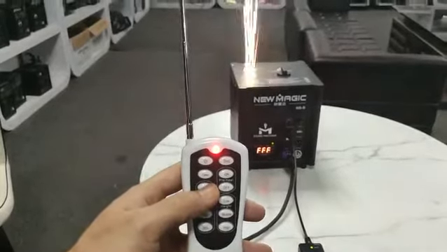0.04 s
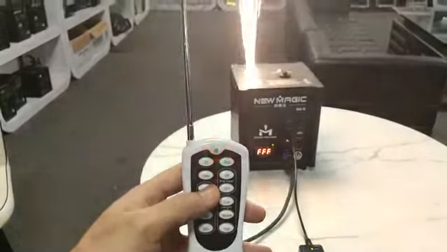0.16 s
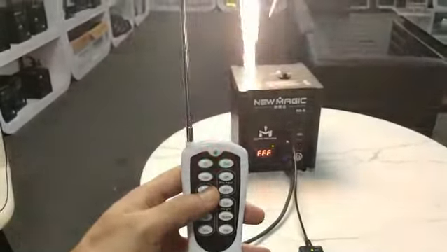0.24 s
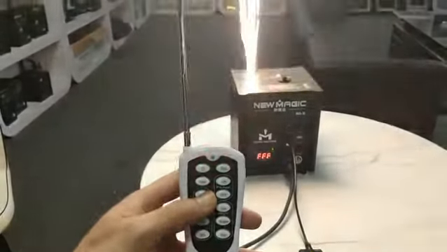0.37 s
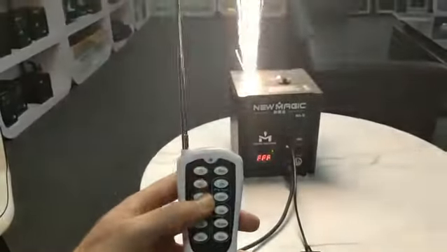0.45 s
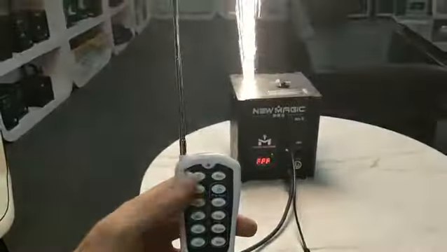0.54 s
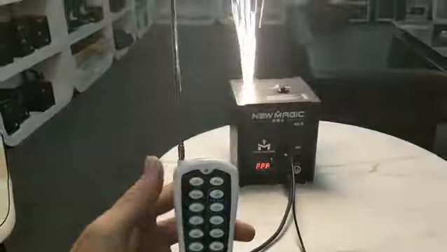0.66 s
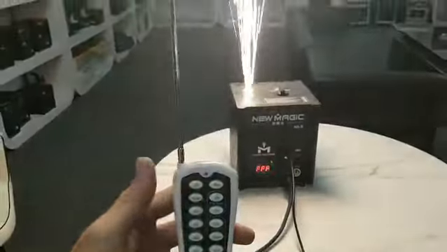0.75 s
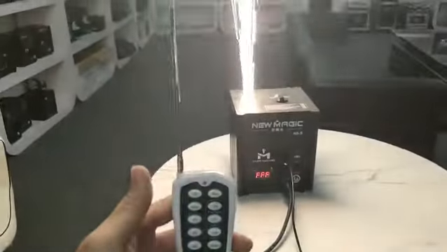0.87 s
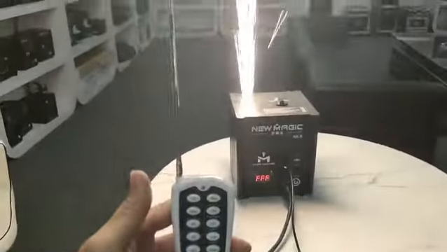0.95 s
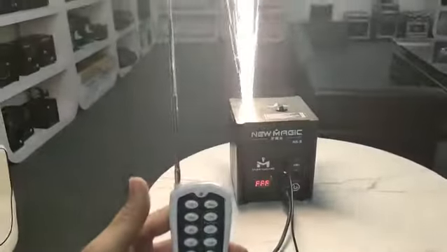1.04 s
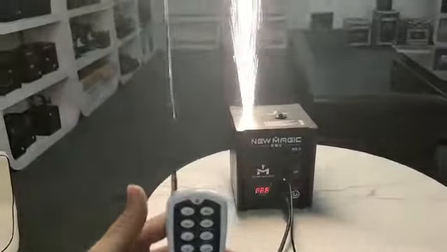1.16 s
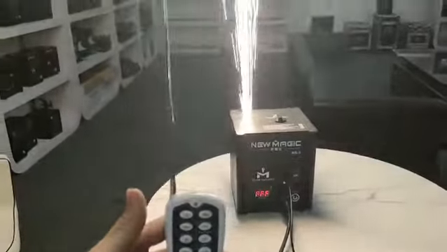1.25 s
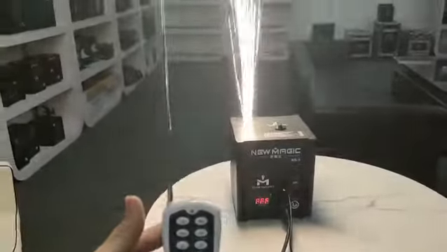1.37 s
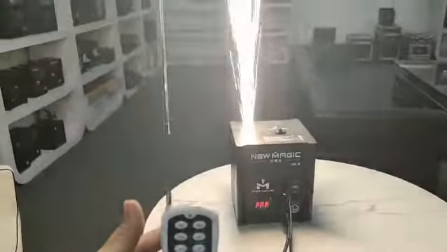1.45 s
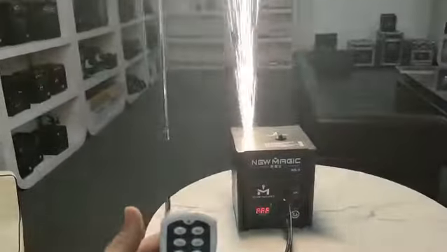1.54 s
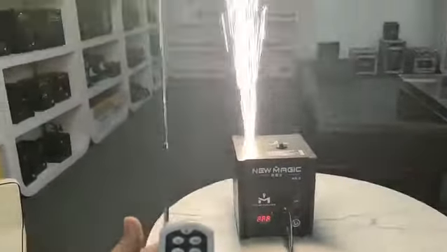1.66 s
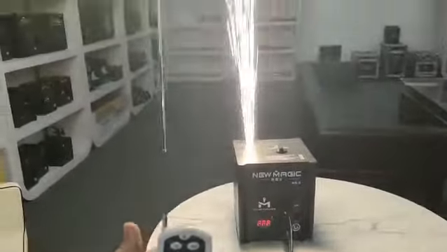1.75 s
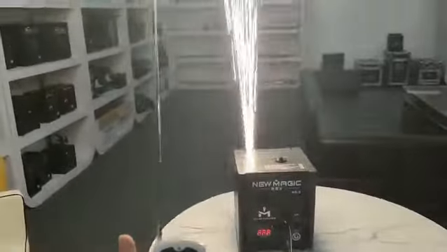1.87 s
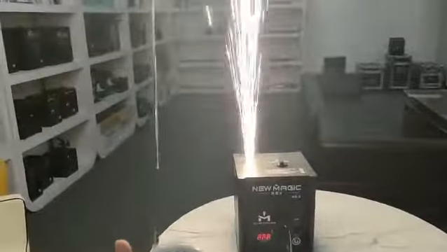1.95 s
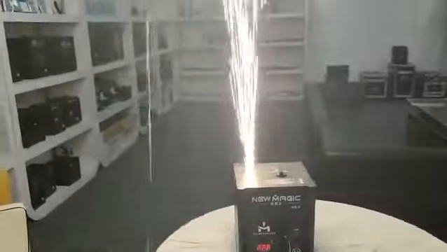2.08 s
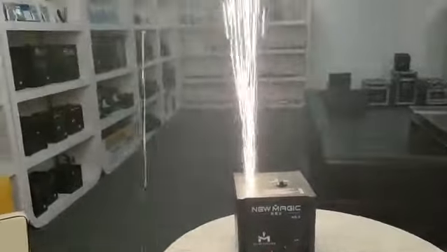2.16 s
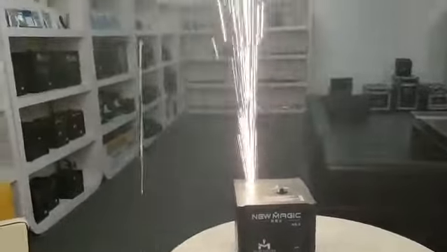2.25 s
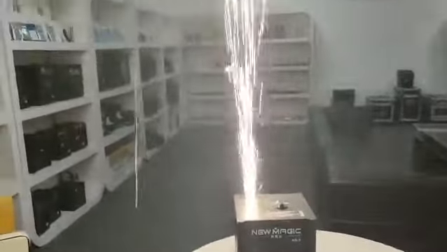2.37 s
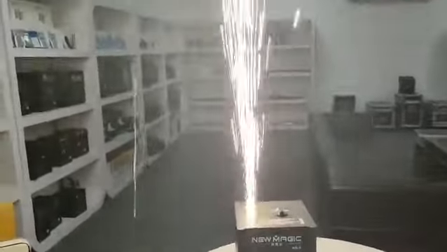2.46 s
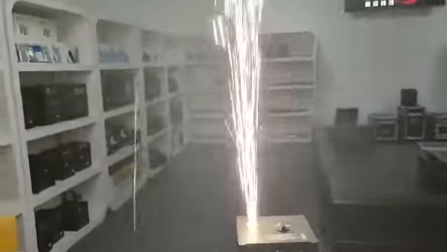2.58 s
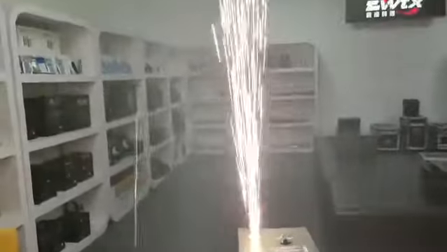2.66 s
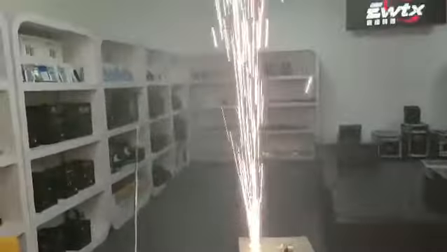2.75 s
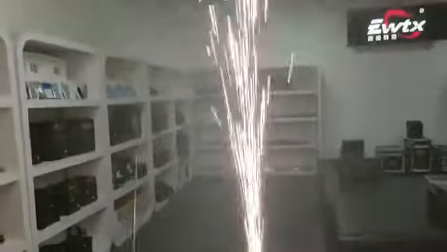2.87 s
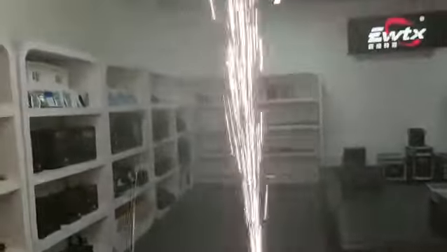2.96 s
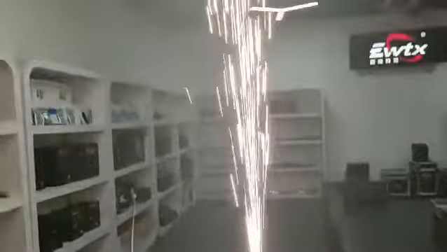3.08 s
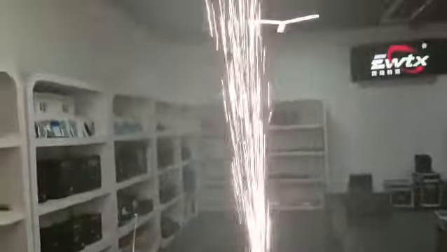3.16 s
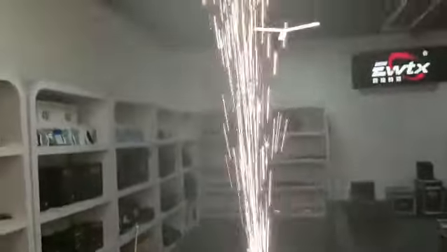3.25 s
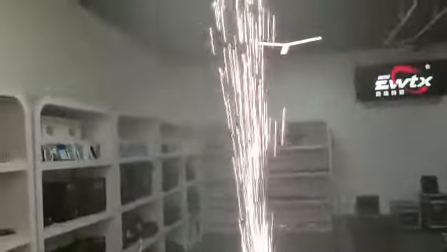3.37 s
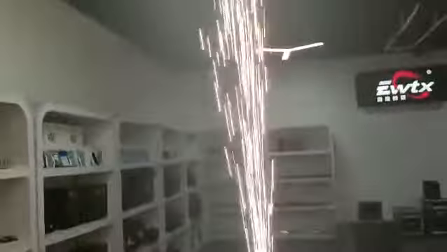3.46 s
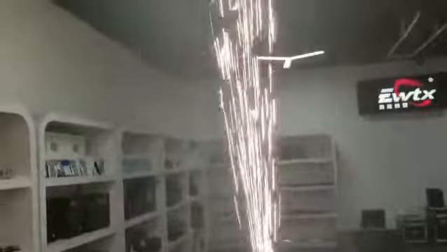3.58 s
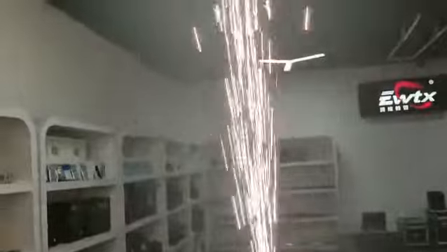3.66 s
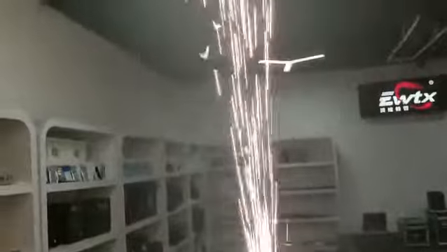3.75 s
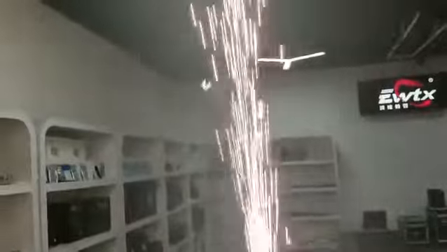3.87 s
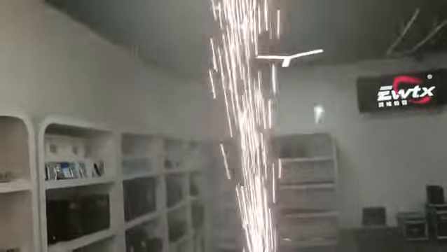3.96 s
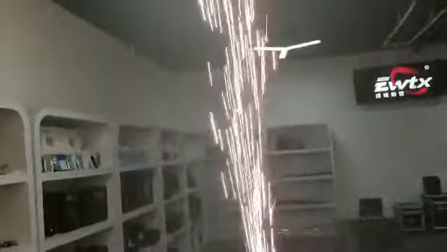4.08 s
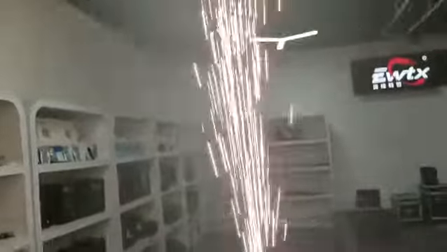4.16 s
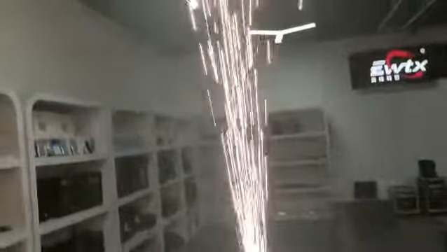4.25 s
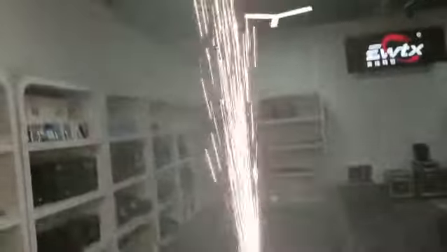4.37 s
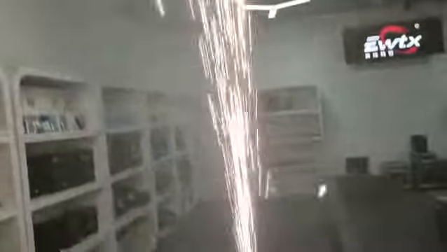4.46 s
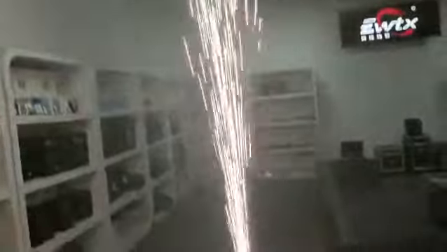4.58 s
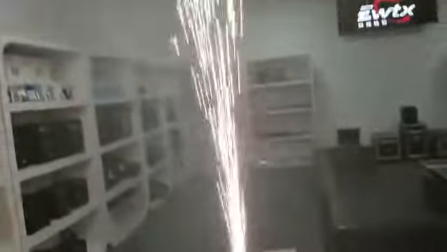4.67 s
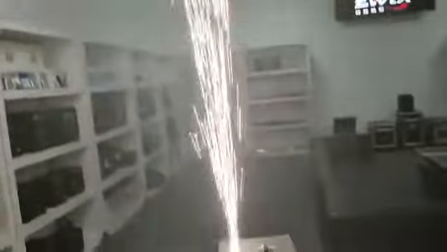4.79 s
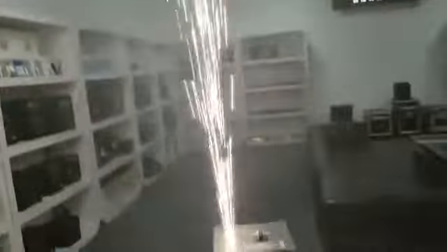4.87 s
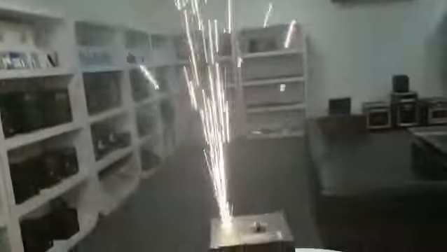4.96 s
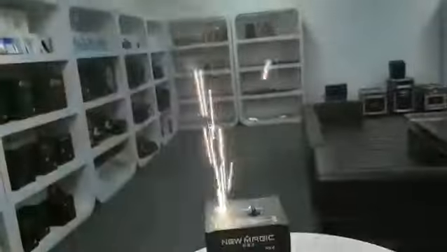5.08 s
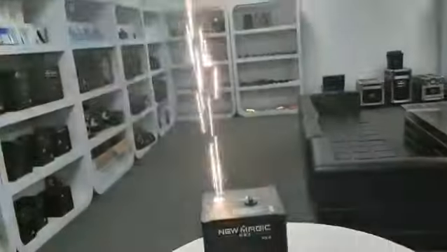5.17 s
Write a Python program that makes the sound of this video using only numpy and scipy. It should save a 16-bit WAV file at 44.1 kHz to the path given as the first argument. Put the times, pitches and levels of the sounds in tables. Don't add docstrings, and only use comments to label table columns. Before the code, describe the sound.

From the very start a spark fountain machine is running at full strength, a metre or two from a hand-held phone in a hard-walled showroom. A broad, breathy roar of air dominates, dense in the mids, with hollow duct resonances around 1.3 kHz and a flickering hiss, cut off above about 7.5 kHz. Beneath it a motor hums near 222 Hz, wavering slightly in pitch, with clean whining overtones, mostly around 0.9 to 2.2 kHz and one fainter near 4.5 kHz. They swell and fade separately, boldest in the first two seconds. From about 2 to 4 s, as the phone is raised, the whine thins and the duct ring grows and sinks slightly. At about 4.6 s the motor cuts abruptly; a high whine glides down and fades while the rush dies away quickly, low tones lingering longest, towards a soft building rumble and 34 Hz drone. Wide stereo, slightly watery phone compression.

```python
import sys
import numpy as np
from scipy import signal
from scipy.io import wavfile
from scipy.ndimage import uniform_filter1d

SR = 44100
rng = np.random.default_rng(int(sys.argv[2]) if len(sys.argv) > 2 else 0)


def linear_from_db(decibels):
    return 10 ** (np.asarray(decibels, float) / 20)


def to_wav(sig):
    pcm = np.clip(np.atleast_2d(sig), -1, 1) * 32767
    pcm = np.round(pcm).astype(np.int16)
    wavfile.write(sys.argv[1], SR, pcm.T)


N = 230334
WINDOW, HOP = 1024, 256


def curves(table, t):
    s, *columns = np.transpose(table)
    return [np.interp(t, s, column) for column in columns]


def over(table, hz):
    f, value = np.transpose(table)
    return np.interp(np.log(hz + 1), np.log(f), value)


def walk(shape, *spans):
    x = rng.standard_normal(shape)
    for axis, span in enumerate(spans):
        size = max(int(span), 1)
        x = uniform_filter1d(uniform_filter1d(x, size, axis=axis), size, axis=axis)
    return x / x.std()


def grid():
    hz = np.arange(WINDOW // 2 + 1)[:, None] * SR / WINDOW
    return hz, np.arange(-(-N // HOP) + 1) * HOP / SR


def noise(db, like, lean_db):
    mid, side = signal.stft(rng.standard_normal((2, N)), nperseg=WINDOW, noverlap=WINDOW - HOP)[2]
    like = np.clip(like, -1, 1)
    mid = mid * np.sqrt((1 + like) / 2)
    side = side * np.sqrt((1 - like) / 2)
    left = (mid + side) * linear_from_db(db + lean_db / 2)
    right = (mid - side) * linear_from_db(db - lean_db / 2)
    return signal.istft(np.array([left, right]), nperseg=WINDOW, noverlap=WINDOW - HOP)[1][:, :N]


def per_hz(db, hz, lo_hz, hi_hz):
    inside = (hz[:, 0] >= lo_hz) & (hz[:, 0] < hi_hz)
    return db - 10 * np.log10(np.sum(linear_from_db(2 * db[inside, 0])) / len(hz))


# overtone_number, start_s, length_s, level_db
LOUD_SPOTS = [(4, .15, .35, -35), (4, .8, 1.4, -36), (4, 2.3, .75, -36), (7, .13, .32, -27),
              (7, .45, .3, -31), (7, .75, .18, -28), (7, 1.0, 1.2, -38), (7, 2.9, .3, -37),
              (7, 3.95, .25, -36), (8, .1, .28, -31), (8, .85, .6, -35), (8, 1.45, .78, -29.5),
              (8, 2.25, .3, -36), (8, 2.75, .12, -35), (8, 3.55, .42, -37), (9, .35, .3, -38),
              (9, 1.0, .8, -37), (9, 1.85, .75, -39), (9, 3.55, .3, -39), (10, .85, .6, -33),
              (10, 1.9, .35, -39), (10, 2.35, .2, -36), (10, 2.62, .15, -37), (10, 4.35, .2, -43),
              (20, .18, .48, -39), (20, .8, .45, -37), (20, 1.43, .15, -39), (20, 1.97, .2, -39),
              (20, 2.74, .14, -40), (20, 3.8, .75, -46)]


def heard_db(order, quiet_db, trim_db, t):
    edge_s = .04
    gain = linear_from_db(quiet_db) + 0 * t
    for k, start, length, db in LOUD_SPOTS:
        if k == order:
            inside_s = np.minimum(t - start, start + length - t)
            gain = gain + linear_from_db(db + trim_db) * np.clip(inside_s / edge_s + .5, 0, 1)
    return 20 * np.log10(gain)


# time_s, pitch_hz
SHAFT_SPEED = [(0, 220.3), (.15, 222.2), (.6, 224.5), (.75, 224.3), (.92, 223), (2.15, 223), (2.55, 222.2),
               (2.8, 223.1), (3.2, 225), (4.0, 225.4), (4.45, 225), (4.6, 224.3)]
# time_s, level_db
SHAFT_HUM = [(0.0, -37), (0.14, -29.5), (0.33, -25.5), (1.89, -29), (2.49, -36.5), (2.64, -29.5),
             (2.68, -33), (3.21, -33), (3.7, -33), (4.15, -31), (4.48, -27), (4.58, -27)]
SWELLING = (4, 7, 8, 9, 10, 20)
# quiet_spot_level_db, loud_spot_trim_db
QUIET_SPOTS = [(-43, -5.5), (-44.5, -3), (-44.5, -2.5), (-41.5, -9), (-46, -2.5), (-57, -0.5)]
# overtone_number, level_db
WEAK_OVERTONES = [(2, -50.5), (3, -48), (5, -42), (6, -43), (11, -48), (12, -42)]
# overtone_number, level_db
OPPOSITE_OVERTONES = [(3, -52), (4, -43), (5, -39), (6, -46), (7, -36), (8, -35), (9, -39), (10, -39),
                      (12, -45), (20, -43)]


def motor():
    cut_s, fade_db_s = 4.61, 400
    t = np.arange(N) / SR
    hz, = curves(SHAFT_SPEED, t)
    hum_db, = curves(SHAFT_HUM, t)
    turn = 2 * np.pi * np.cumsum(hz) / SR
    power = linear_from_db(-fade_db_s * np.maximum(t - cut_s, 0))
    away_db = -1.0 * t

    def drift(span):
        frames = walk(N // HOP + 2, span)
        return np.interp(t * SR / HOP, np.arange(len(frames)), frames)

    def partial(k, db, fade_db, span=30):
        fade = drift(span)
        wobble = drift(10)
        phase = k * turn + 0.061 * k * wobble + 2 * np.pi * rng.random()
        return np.sqrt(2) * linear_from_db(db + fade_db * fade) * np.sin(phase)

    mid = partial(1, hum_db, .26)
    for k, (quiet_db, trim_db) in zip(SWELLING, QUIET_SPOTS):
        mid = mid + partial(k, heard_db(k, quiet_db, trim_db, t), 1.4, span=10)
    mid = mid + sum(partial(k, db + away_db - 1, 3.5) for k, db in WEAK_OVERTONES)
    side = sum(partial(k, db + 1 + away_db / 2, 2.5) for k, db in OPPOSITE_OVERTONES)
    ports = np.array([mid + side, mid - side])
    upper = signal.sosfiltfilt(signal.butter(3, 1850, "high", fs=SR, output="sos"), ports)
    return power * (ports + np.array([[.4], [-.4]]) * upper)


def coast():
    slot_hz, start_s, slowest_share, slowing_s = 4490, 4.585, .5, .18
    level_db, fade_db_s = -31, 50
    after = np.arange(N) / SR - start_s
    speed = slowest_share + (1 - slowest_share) * np.exp(-np.maximum(after, 0) / slowing_s)
    turn = 2 * np.pi * np.cumsum(slot_hz * speed) / SR
    db = level_db - fade_db_s * after + 4 * np.repeat(walk(N // HOP + 1, 5), HOP)[:N]
    rise = np.clip(after / .07, 0, 1) ** 2
    return np.sqrt(2) * linear_from_db(db) * rise * np.sin([turn, turn + 2.2])


def raised(t):
    raise_s, raise_lasts_s, lower_s, lower_lasts_s = 1.84, 1, 3.95, 0.21
    up = np.clip((t - raise_s) / raise_lasts_s, 0, 1)
    return up * np.clip(1 - (t - lower_s) / lower_lasts_s, 0, 1)


# pitch_hz, level_db (per Hz)
AIR_COLOUR = [(140, -28.5), (200, -10), (270, -19.5), (400, -14), (520, -17.5), (900, -11), (1030, -11),
              (1300, -11.5), (1600, -10.5), (2000, -12.5), (2600, -13), (4500, -16), (7400, -21.5),
              (7900, -54)]
# pitch_hz, width_hz, boost_db
DUCT_RINGS = [(312.4, 38, 8), (417, 55, 6), (712, 80, 5), (1000, 100, -2), (1264, 176, 7), (1560, 52, -2),
              (1975, 74, -1.5), (2000, 64, 3.5), (2540, 140, 3), (3510, 150, 3), (3730, 780, 3),
              (4030, 69, 1), (5210, 220, 0)]
# pitch_hz, fade_db_per_s
AIR_FADE = [(210, 42), (320, 19.5), (700, 30), (1250, 43.5), (2500, 37.5), (6000, 39.5)]
# pitch_hz, change_db
RAISED_COLOUR = [(300, 2), (700, -1), (1250, 0.5), (2200, -0.5), (3500, -0.5), (7000, 1)]
# pitch_hz, likeness (-1 to 1)
PORT_LIKENESS = [(170, .99), (290, .98), (500, .75), (900, .5), (1300, .35), (1700, .05), (2100, .1),
                 (2600, .2), (4200, -.05), (7000, -.05)]
# pitch_hz, share of the left lean
LEFT_LEAN = [(500, 0), (900, -0.5), (1400, -.1), (2500, 1.8), (4100, .9), (7000, 0.5)]


def air():
    flow_db, start_boost_db, spin_up_s = -29.5, 0.5, 0.13
    sag_s, hiss_sags_early_s = 4.67, 0.072
    ring_grows_s, ring_grows_db_s, ring_sinks_hz_s = 2.2, 1.1, 35
    nozzle_alike_low, nozzle_alike_raised = -.62, .55
    lean_db, raised_lean_db = 2, 1
    hz, t = grid()
    up = raised(t)
    early_s = hiss_sags_early_s / (1 + (2600 / (hz + 1)) ** 4)
    sagging_s = np.maximum(t - sag_s + early_s, 0)
    level_db = flow_db + start_boost_db * np.exp(-t / spin_up_s) - over(AIR_FADE, hz) * sagging_s
    rings_db = sum(db / (1 + (2 * (hz - f) / w) ** 2) for f, w, db in DUCT_RINGS)
    colour = over(AIR_COLOUR, hz) + rings_db

    high = 1 / (1 + (3000 / (hz + 1)) ** 8)
    shape = (len(hz), len(t))
    swell = 1.2 * walk(shape, 3, 60)
    swell = swell + 1.5 * walk(shape, 2, 14) / (1 + (hz / 600) ** 4)
    swell = swell + 1.5 * high * walk(shape, 14, 3)
    growing_s = np.maximum(t - ring_grows_s, 0)
    ring_db = 1.3 * walk(len(t), 5) + ring_grows_db_s * growing_s
    swell = swell + ring_db / (1 + ((hz - 1280 + ring_sinks_hz_s * growing_s) / 120) ** 4)

    db = per_hz(colour, hz, 1000, 1480) + level_db + over(RAISED_COLOUR, hz) * up + swell + 1.5
    nozzle_alike = nozzle_alike_low + (nozzle_alike_raised - nozzle_alike_low) * up
    like = over(PORT_LIKENESS, hz) + nozzle_alike / (1 + ((hz - 3630) / 260) ** 2)
    return noise(db, like, over(LEFT_LEAN, hz) * (lean_db + raised_lean_db * up))


# pitch_hz, level_db (per Hz)
RUMBLE_COLOUR = [(12, -18), (22, -12), (36, -7.5), (45, -19.5), (65, -15), (80, -18), (100, -16),
                 (125, -24), (170, -25), (300, -16.5), (420, -35.5), (1000, -46.5), (7000, -55)]


def hall():
    rumble_level_db, drone_hz, drone_level_db = -45.5, 34.1, -40
    dip_s, dip_width_s, dip_db = 2.9, .8, -5
    hz, t = grid()
    rumble_db = per_hz(over(RUMBLE_COLOUR, hz), hz, 45, 170) + rumble_level_db
    rumble = noise(rumble_db + 1.5 * walk((len(hz), len(t)), 2, 40), .982, 0 * hz)
    s = np.arange(N) / SR
    waver = np.interp(np.arange(N) / HOP, np.arange(len(t)), walk(len(t), 9))
    drone_db = drone_level_db + dip_db * np.exp(-((s - dip_s) / dip_width_s) ** 2) + 3.5 * waver
    port_phase = np.array([[-.07], [.07]]) * (1 + .6 * waver[::-1])
    drone = np.sqrt(2) * linear_from_db(drone_db) * np.sin(2 * np.pi * drone_hz * s + .5 * waver + port_phase)
    return rumble + drone


def scene():
    return motor() + coast() + air() + hall()


# pitch_hz, width_hz, weakness_db
WEAK_BANDS = [(1010, 80, 3), (1450, 70, 2), (1670, 90, 3), (1900, 90, 2.5), (2350, 90, 2), (3000, 120, 1.5),
              (3600, 260, 3.8), (4050, 150, 3.2), (4300, 120, 2.6), (5500, 500, 1.8)]


def starve(x, depth_db=30.):
    hz, t = grid()
    z = signal.stft([x[0] + x[1], x[0] - x[1]], nperseg=WINDOW, noverlap=WINDOW - HOP)[2]
    power = np.abs(z) ** 2 + 1e-18
    band = uniform_filter1d(uniform_filter1d(power, size=3, axis=1), size=8, axis=2)
    mask = uniform_filter1d(uniform_filter1d(power, size=15, axis=1), size=24, axis=2)
    weak_db = sum(db / (1 + (2 * (hz - f) / w) ** 4) for f, w, db in WEAK_BANDS)
    spare_db = 4.5 + 40 / (1 + (hz / 750) ** 10) - weak_db
    weaker_db = np.clip(10 * np.log10(2 * mask / mask.sum(axis=0)), -6, 3)
    luck = .8 * walk(z.shape, 1, 4, 6) + 1.25 * walk(z.shape[1:], 4, 6)
    budget_db = 7 * np.log10(band / mask) + .6 * weaker_db + 1.25 * luck + spare_db
    slices = 1.9 - walk(z.shape, 1, 12, 2) - walk(z.shape[1:], 12, 2) + 3 / (1 + (hz / 3700) ** 10)
    faint = (power < .2 * mask) * (hz > 900)
    lost = np.clip(-budget_db / .7, 0, 1) + .7 * np.clip(-slices / .3, 0, 1) + .4 * faint
    edge_hz = 7530 - 45 * np.abs(walk(len(t), 11)) ** 1.8
    kept = z * linear_from_db(-depth_db * lost) * (hz < edge_hz)
    mid, side = signal.istft(kept, nperseg=WINDOW, noverlap=WINDOW - HOP)[1][:, :N]
    return np.array([mid + side, mid - side]) / 2


def low_pass(x):
    return signal.sosfilt(signal.butter(12, 7610, fs=SR, output="sos"), x)


def record(dry):
    rounded = np.tanh(0.63 * dry) / 0.58
    mix = starve(rounded)
    return low_pass(mix)


dry = scene()
out = record(dry)
to_wav(out)
```